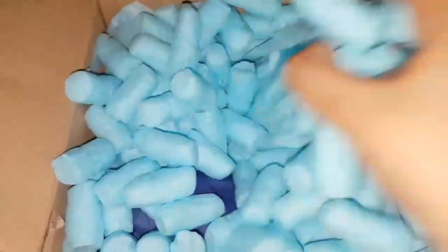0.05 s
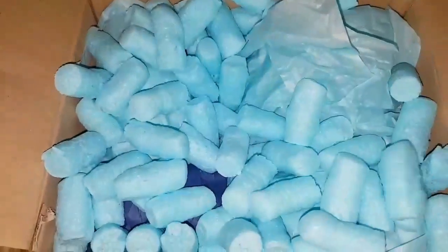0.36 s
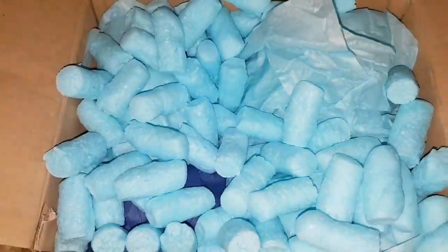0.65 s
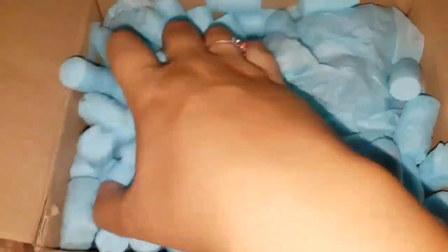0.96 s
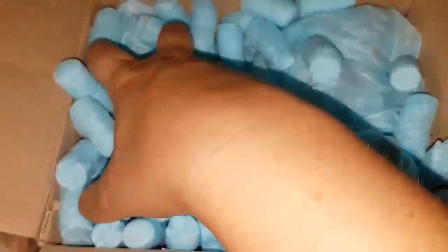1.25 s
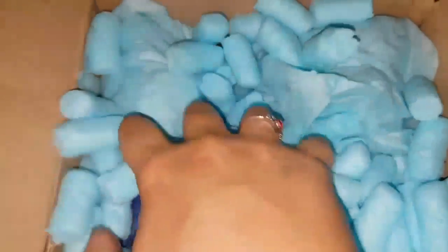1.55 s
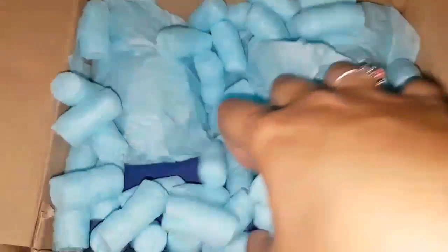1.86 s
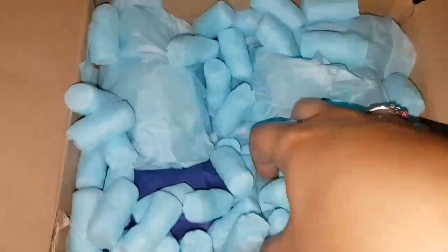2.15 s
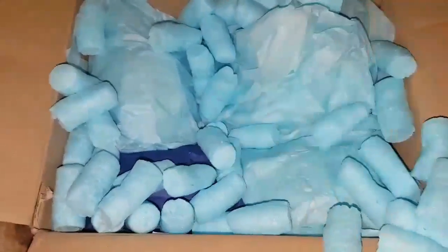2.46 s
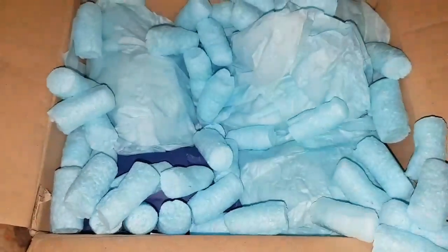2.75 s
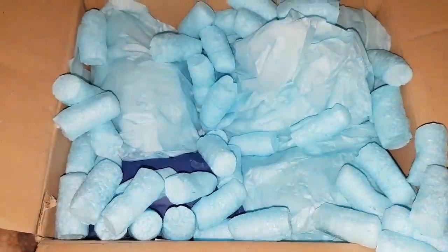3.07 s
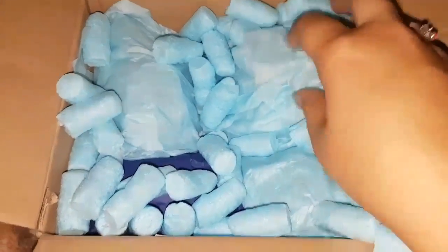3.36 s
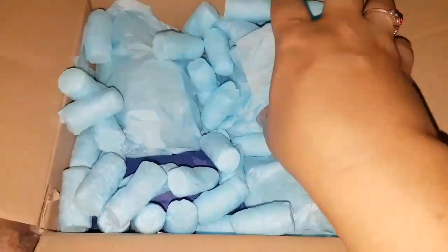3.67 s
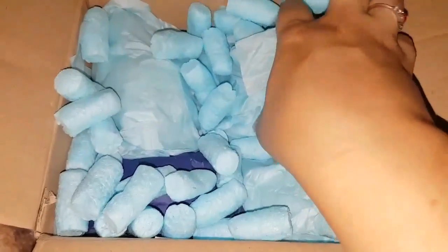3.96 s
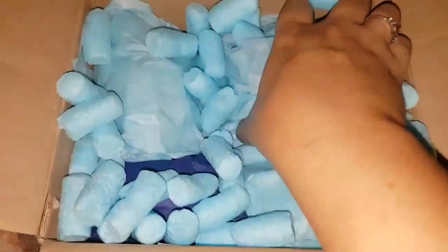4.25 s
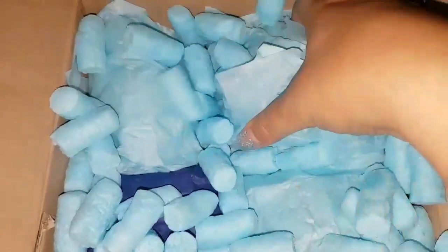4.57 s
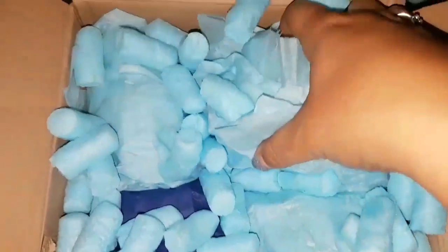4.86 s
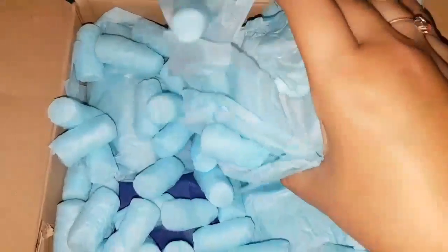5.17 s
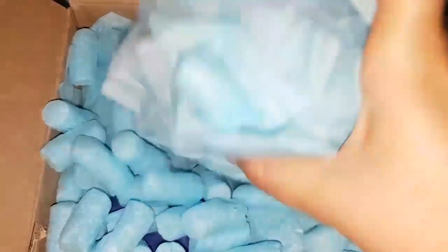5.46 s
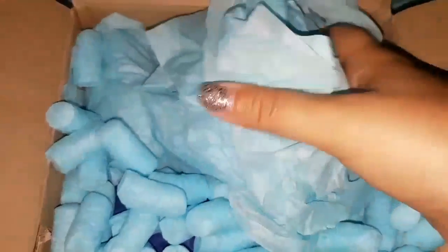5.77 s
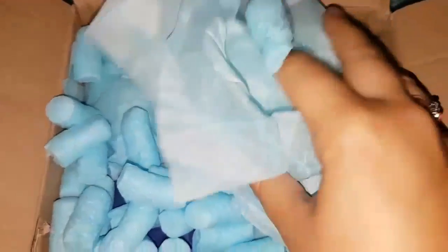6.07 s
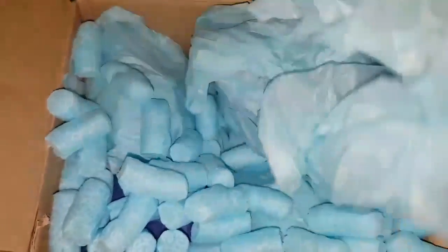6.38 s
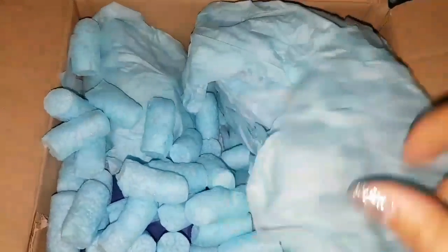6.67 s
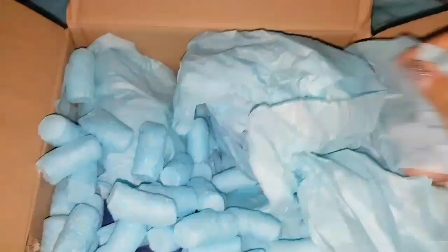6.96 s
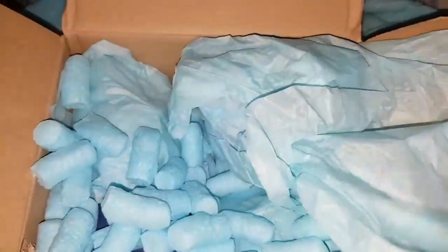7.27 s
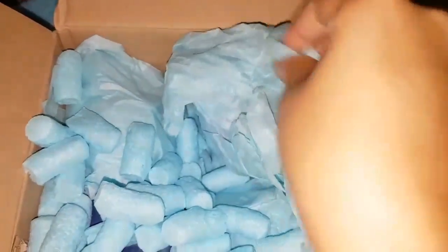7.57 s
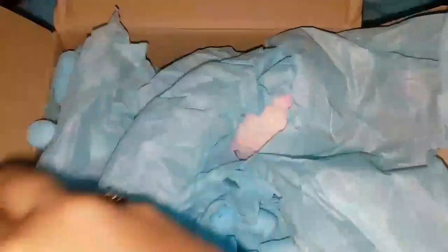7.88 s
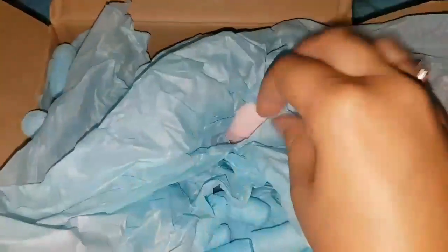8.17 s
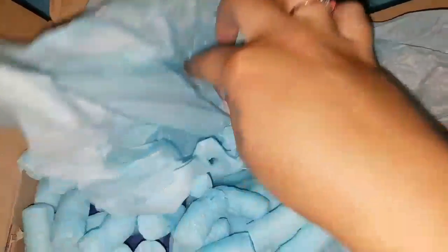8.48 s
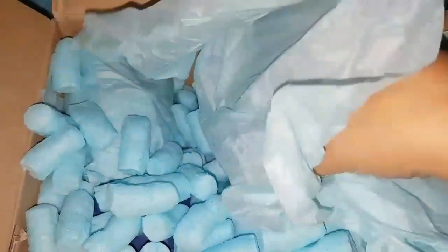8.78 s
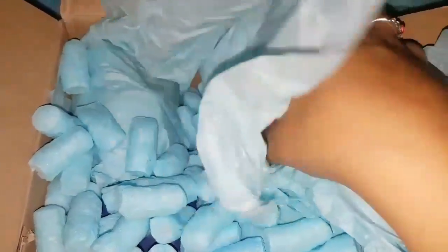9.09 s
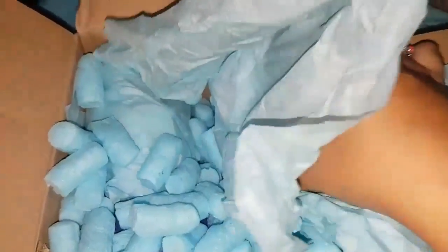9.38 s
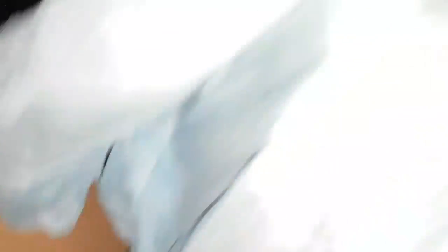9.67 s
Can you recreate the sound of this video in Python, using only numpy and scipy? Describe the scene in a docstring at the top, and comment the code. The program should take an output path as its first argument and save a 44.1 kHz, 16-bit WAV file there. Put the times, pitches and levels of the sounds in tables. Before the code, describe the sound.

Tissue paper crinkles and foam packing peanuts rub together as a hand stirs them in quick, irregular strokes, with small hollow taps and a low rumble from the cardboard box. The movement settles briefly, then returns as nearly continuous rustling with crisp crackles, ending in a cluster of knocks and scrapes. The sound is close and fairly dry, indoors, with faint room air and two short microphone bumps on the right.

```python
"""A hand rummages through foam packing peanuts and tissue paper in a cardboard box, close by in a small room.
Each stroke sets off a rush of tiny slips: the foam scrapes, the sheet rustles, its creases crackle
and the box rumbles. Peanuts drop and knock on the cardboard, creases snap, and twice something
bumps the right microphone. Faint room air lies underneath."""
import sys
import numpy as np
from scipy import signal
from scipy.io import wavfile
from scipy.ndimage import uniform_filter1d

SR = 44100
rng = np.random.default_rng(int(sys.argv[2]) if len(sys.argv) > 2 else 0)


def pcm_store(signal):
    """Save signal as 16-bit PCM."""
    levels = np.round(np.clip(np.atleast_2d(signal), -1, 1) * 32767)
    wavfile.write(sys.argv[1], SR, levels.astype(np.int16).T)


N = 429093


# strokes of the hand: t/s, length/s, rise/s, level/dB, grip
STROKES = [ (0.0, 0.078, 0.0033, -46.5, "lift"), (0.097, 0.089, 0.025, -46.5, "lift"),
           (0.19, 0.049, 0.017, -53, "lift"), (0.336, 0.024, 0.044, -46.5, "stir"),
           (0.876, 0.19, 0.077, -47, "plunge"), (1.098, .2, 0.013, -48.5, "plunge"),
           (1.253, 0.028, 0.032, -41.5, "grab"), (1.334, 0.061, 0.012, -47.5, "plunge"),
           (1.413, 0.074, 0.023, -52, "dig"), (1.483, 0.044, .015, -44.5, "stir"),
           (1.547, 0.14, 0.053, -46.5, "stir"), (1.698, 0.088, 0.045, -47.5, "stir"),
           (1.83, 0.24, 0.016, -48.5, "stir"), (1.914, 0.047, 0.024, -46, "lift"),
           (2.087, .15, 0.028, -45.5, "scoop"), (2.241, .15, 0.13, -42, "scoop"),
           (2.408, 0.1, 0.044, -42, "scoop"), (2.518, .04, 0.017, -45.5, "grab"),
           (2.595, 0.23, 0.017, -61, "settle"), (2.874, 0.17, 0.042, -74.5, "settle"),
           (3.427, 0.029, 0.022, -48.5, "plunge"), (3.485, 0.12, .13, -52, "dig"),
           (3.63, 0.093, 0.011, -47, "grab"), (3.744, 0.11, 0.014, -48, "scoop"),
           (3.885, 0.15, 0.035, -52.5, "dig"), (4.066, 0.14, 0.032, -46, "grab"),
           (4.234, 0.15, 0.086, -43, "scoop"), (4.413, 0.075, 0.059, -44.5, "dig"),
           (4.54, 0.088, 0.017, -44, "grab"), (4.667, 0.091, 0.037, -47.5, "dig"),
           (4.789, 0.066, 0.047, -41, "pull"), (4.877, 0.065, 0.029, -42, "grab"),
           (4.983, 0.08, 0.015, -56.5, "dig"), (5.06, 0.27, 0.042, -51.5, "dig"),
           (5.34, 0.069, 0.035, -49.5, "grab"), (5.437, 0.12, 0.014, -56, "lift"),
           (5.571, 0.12, .02, -50, "lift"), (5.72, 0.11, 0.11, -47, "lift"),
           (5.876, 0.063, 0.024, -48, "pull"), (5.959, .29, 0.12, -46.5, "lift"),
           (6.192, .18, .17, -43.5, "lift"), (6.232, 0.16, 0.027, -49, "pull"),
           (6.399, 0.32, 0.05, -46.5, "pull"), (6.46, .025, 0.021, -46.5, "pull"),
           (6.694, 0.14, 0.048, -45.5, "pull"), (6.841, .08, 0.025, -49, "pull"),
           (6.934, 0.1, 0.04, -43, "pull"), (7.071, 0.12, 0.087, -43.5, "pull"),
           (7.192, .14, 0.013, -48.5, "pull"), (7.431, 0.069, .03, -54.5, "grab"),
           (7.519, 0.17, 0.0063, -48, "grab"), (7.709, 0.27, 0.057, -45, "pull"),
           (7.848, 0.1, 0.069, -48.5, "scoop"), (8.024, 0.037, 0.027, -50, "dig"),
           (8.165, .16, 0.16, -53.5, "grab"), (8.389, 0.29, 0.2, -48.5, "pull"),
           (8.67, 0.21, 0.06, -44, "pull"), (8.91, 0.17, 0.11, -45, "grab"), (9.09, 0.18, .05, -47, "grab"),
           (9.311, 0.3, 0.029, -50, "grab")]
# what each grip stirs, relative to the sheet: grip -> foam/dB, box/dB, creases/dB
GRIPS = {"plunge": (-0.43, -2, 0.19), "dig": (0, -5, -1.1), "stir": (-0.45, -17, -1.5),
         "scoop": (-1.57, -10.5, -5), "grab": (-2.5, -7, -4.5), "pull": (-5, -9.5, -1.4),
         "lift": (-2, -43.5, -1.8), "settle": (-12.5, -2.5, 0.46)}
# the heap is never quite still: sheet/dB, foam/dB, box/dB, creases/dB
REST_LEVELS = (-74.5, -76, -67.5, -79)

def hand_strokes(release_db_per_s=247.5):
    """Each stroke swells, holds and dies away; gives dB envelopes for sheet, foam, box and creases."""
    t = np.arange(0, N + 64, 64) / SR
    power = gain_of(REST_LEVELS)[:, None] ** 2
    for start, length, rise, db, grip in STROKES:
        attack = np.clip((t - start) / rise, 0, 1)
        release = gain_of(-release_db_per_s * np.maximum(t - start - length, 0))
        power = power + np.outer(gain_of(db + np.r_[0, GRIPS[grip]]), attack * release) ** 2
    return [np.interp(np.arange(N) / SR, t, 10 * np.log10(row)) for row in power]


def slips(level_db, per_s, band_hz, cycles, spread_db, lag_s, size):
    """Tiny ringing slips: a thinner patter under a light touch, a dense rush under a hard one."""
    chance = rng.random((N, 5))
    activity = gain_of(.6 * np.minimum(level_db + 44.5, 0))  # share of the full rate per_s
    at = np.flatnonzero(chance[:, 0] < activity * per_s / SR)
    strength, pitch, angle, side = chance[at, 1:].T[:, :, None]
    hz = np.interp(pitch, [0, 1], band_hz)
    height = gain_of(spread_db * np.minimum(-np.log(1 - strength), 3.5))
    height *= np.sqrt(hz / activity[at, None])  # shorter or fewer grains hit harder
    height *= rng.choice([-1, 1], N)[at, None]
    channels = []
    for delay, near in ((angle, side), (1 - angle, 1 - side)):
        t = np.maximum(np.arange(size) / SR - lag_s * delay, 0)
        grains = height * (1.6 + near) * ring(t, hz, cycles / hz)
        channels.append(np.bincount((at[:, None] + np.arange(size)).ravel(), grains.ravel(), N)[:N])
    return np.array(channels)


# hollow midrange of the peanuts: f/Hz, level/dB
FOAM_EQ = [(150, -29.5), (330, -7), (500, -5.5), (720, 0), (1000, -4), (1300, -7), (2200, -24), (5000, -55)]

def foam_rub(level_db, jerk):
    """Peanuts slip against each other in a dry, grainy scrape."""
    grains = slips(level_db, per_s=1600, band_hz=(356, 1187),
                   cycles=6.1, spread_db=2, lag_s=0.00018, size=512)
    clumps = unit_rms(colour(grains, FOAM_EQ) * gain_of(1.4 * jerk))
    return clumps * gain_of(level_db + 0.5) * panned(left_db=2.5)


# papery body of the sheet: f/Hz, level/dB
SHEET_EQ = [(400, -26), (850, -2.5), (1200, 0), (1700, 0), (2100, -3), (2600, -1.5), (3300, -7.5),
            (4300, -3), (8000, -70)]
# crisp top of the creases, with the microphone's dip near 9.3 kHz: f/Hz, level/dB
CREASE_EQ = [(1200, -24), (2800, -1), (3900, -1.5), (5000, -1), (6300, -1), (8000, -2.5), (9300, -10),
             (11200, -4), (13000, -6.5), (15500, -7)]

def tissue_rustle(sheet_db, crease_db, jerk):
    """The sheet slips in a soft rustle while its creases add a finer, brighter crackle."""
    sheet = slips(sheet_db, per_s=4000, band_hz=(1017, 3770),
                  cycles=6.2, spread_db=1, lag_s=0.00022, size=192)
    creases = slips(crease_db, per_s=14000, band_hz=(3030, 16200),
                    cycles=6.8, spread_db=1.5, lag_s=0.000399, size=80)
    sheet = unit_rms(colour(sheet, SHEET_EQ) * gain_of(1.3 * jerk)) * gain_of(sheet_db + 0.54)
    creases = unit_rms(colour(creases, CREASE_EQ) * gain_of(1.61 * jerk)) * gain_of(crease_db + 0.35)
    return folds((sheet + creases) * panned(left_db=4), depth_db=1.74)


def folds(paper, depth_db):
    """The paper keeps changing shape, so its resonances come and go in patches."""
    spectrum = signal.stft(paper, SR, nperseg=512)[2]
    patches = uniform_filter1d(rng.standard_normal(spectrum.shape[1:]), size=7, axis=0)  # across pitch
    patches = uniform_filter1d(patches, size=9, axis=1)  # across time
    return signal.istft(spectrum * gain_of(depth_db * unit_rms(patches)), SR, nperseg=512)[1][:, :N]


def crackles(crease_db, per_s=41, growth=0.8):
    """Now and then a stiffer crease gives way in a short run of breaks, standing out of the rush."""
    clicks = (rng.random(N) < per_s / SR) * rng.uniform(.4, 1, N)
    clicks *= gain_of(growth * (crease_db + 46))
    bursts = signal.lfilter([1], [1, -np.exp(-1 / (0.0012 * SR))], clicks)
    return colour(bursts * rng.standard_normal((2, N)), CREASE_EQ) * gain_of(-38) * panned(left_db=4)


# low weight of the cardboard: f/Hz, level/dB
BOX_EQ = [(15, 3), (40, -13), (90, -2.5), (200, 0), (300, -2), (420, -8), (700, -40.5), (1500, -54)]

def box_rumble(level_db, jerk):
    """Slips on the cardboard ring low and blur into a rumble."""
    grains = slips(level_db, per_s=600, band_hz=(50, 410),
                   cycles=4.4, spread_db=1, lag_s=0.00023, size=1024)
    clumps = unit_rms(colour(grains, BOX_EQ) * gain_of(1.6 * jerk))
    return clumps * gain_of(level_db + 1.66) * panned(left_db=2.5)


# a peanut or a fold dragging: middle t/s, length/s, level/dB, f/Hz, bandwidth/Hz
SCRAPES = [ (0.077, .03, -49.5, 1380, 250), (0.149, 0.11, -49.5, 2220, 500),
           (1.778, 0.018, -53, 11000, 1500), (3.282, .078, -67, 445, 90), (3.755, 0.018, -45.5, 714, 150),
           (4.519, 0.031, -56, 6700, 1300), (5.139, 0.097, -49, 1060, 250),
           (6.36, 0.076, -46.5, 3000, 3500), (6.735, .035, -42, 2230, 1500),
           (8.816, 0.077, -53, 11800, 2500), (8.831, 0.077, -49, 5900, 3000),
           (8.996, 0.076, -45.5, 610, 150), (9.042, .075, -41.5, 786, 110),
           (9.035, 0.067, -45.5, 1790, 350), (9.523, 0.065, -47, 1440, 300)]

def scrapes():
    """Rapid uneven stick and slip drives one resonance, swelling and fading."""
    out = np.zeros((2, N))
    for middle, length, db, hz, width in SCRAPES:
        t = np.arange(int(length * SR)) / SR
        shared, *apart = rng.standard_normal((3, SR // 4))[:, :len(t)]
        friction = shared + 0.73 * np.array(apart)
        mode = np.sin(2 * np.pi * hz * t) * t * np.exp(-np.pi * 1.5 * width * t)
        chatter = signal.fftconvolve(friction, mode[None], axes=1)[:, :len(t)]
        swell = unit_rms(chatter * np.hanning(len(t)))
        add(out, max(middle - length / 2, 0), gain_of(db) * swell * panned(left_db=3.5))
    return out


# peanuts and fingers striking the cardboard: t/s, level/dB, spot f/Hz, t60/s, relative thud/dB
KNOCKS = [ (0.312, -33, 510, 0.017, -8), (0.3668, -17.5, 770, 0.013, -33), (0.3749, -23.5, 687, .023, -30),
          (.3910, -7.5, 1030, 0.0062, -29), (.3950, -23, 670, 0.028, -15), (.438, -28.5, 595, 0.019, -19),
          (0.5831, -18, 754, 0.014, -33), (0.6121, -22.5, 666, 0.02, -33), (.6727, -40, 900, 0.0057, 1),
          (.758, -42, 640, 0.014, -18), (1.225, -32, 700, 0.032, -6), (1.7858, -16.5, 480, 0.0088, -43),
          (2.0845, -22.5, 527, 0.0096, -14), (2.147, -31.5, 570, .025, -22), (2.262, -32, 604, .012, -18),
          (2.384, -27, 380, 0.01, -29), (2.5516, -17.5, 1350, 0.0042, -31), (2.771, -45, 480, 0.016, -12),
          (3.688, -26, 600, 0.0074, -1), (3.6966, -26, 726, .02, -6), (3.728, -32.5, 630, .035, -3),
          (3.835, -23.5, 1250, 0.0095, -20), (4.086, -32.5, 760, 0.017, 0), (4.399, -30.5, 637, 0.017, 1),
          (4.4752, -33, 600, 0.012, 7), (4.5821, -21.5, 745, 0.017, -8), (4.846, -25.5, 1170, 0.014, -19),
          (4.864, -17.5, 1130, 0.0075, -14), (5.109, -42.5, 600, 0.0091, 11),
          (5.2938, -23, 2360, 0.016, -12), (5.7338, -25, 705, 0.022, -37), (5.7909, -23, 670, 0.006, -41),
          (7.215, -32, 620, 0.02, 1), (7.536, -17, 800, 0.0059, -6.5), (7.54, -22.5, 1810, .015, -8),
          (8.958, -33.5, 640, 0.023, 1), (9.003, -24, 650, 0.028, 2), (9.0255, -23, 780, 0.037, -6),
          (9.049, -26.5, 710, 0.023, -27), (9.173, -36.5, 450, 0.0082, 8), (9.3518, -24, 746, 0.007, -1),
          (9.3562, -28.5, 269, 0.032, -7), (9.4095, -27.5, 677, 0.018, 5)]
# ring of the whole box: f/Hz, level/dB, t60/s
BOX_MODES = [(355, -28, 0.14), (513, -14.5, 0.017), (637, -21, 0.081), (814, -17.5, 0.038),
             (920, -17, 0.028), (1400, -19, 0.026), (1740, -36, .016)]

def knocks(scuff_growth=0.5):
    """A blow rings the struck spot and the whole box, pushes the cardboard wall and scuffs the foam."""
    t = np.arange(4096) / SR
    rings, scuffs = np.zeros((2, 2, N))
    mode_hz, mode_db, mode_t60 = np.transpose(BOX_MODES)[:, :, None]
    body = .7 * (gain_of(mode_db) * ring(t, mode_hz, mode_t60)).sum(0)
    contact = 1 - np.exp(-t / 0.00056)  # soft foam takes a moment to press home
    for start, db, hz, t60, thud_db in KNOCKS:
        thud = 2.37 * gain_of(thud_db) * ring(t, hz=125, t60=0.01)
        blow = contact * (1.24 * ring(t, hz, t60) + body) + thud
        scuff_db = -41 + scuff_growth * (db + 26)
        add(rings, start, -gain_of(db) * blow * panned(left_db=3.5))
        add(scuffs, start, gain_of(scuff_db) * np.exp(-t / 0.0015) * panned(left_db=3))
    wall_eq = [(25, -17), (110, -3.5), (400, 2.5), (1800, -2), (2600, -18), (6000, -16)]
    scuff_eq = [(200, -25), (900, 13.5), (1700, 16), (2700, 1.5),
                (7500, 0), (9300, -9), (11500, -8), (16000, -8)]
    return colour(rings, wall_eq) + colour(scuffs * rng.standard_normal((2, N)), scuff_eq)


# the loudest creases giving way: t/s, level/dB, f/Hz
SNAPS = [ (0.584, -41, 4000), (.673, -45, 5000), (0.76, -40, 6000), (1, -24, 4030), (2.5519, -24, 2780),
         (2.644, -33.5, 5000), (2.773, -54, 4000), (2.956, -43, 6700), (3.001, -41, 7000),
         (3.159, -49, 5500), (3.453, -35, 8000), (3.659, -24.5, 2500), (4.4517, -25, 4960),
         (4.557, -14.5, 3520), (4.5574, -28, 7940), (4.6582, -23, 5130), (4.8285, -30, 5000),
         (4.839, -23, 6000), (5.03, -27, 8000), (5.2941, -20, 2820), (5.318, -23.5, 7000),
         (5.39, -42, 4000), (5.407, -28.5, 4200), (5.596, -25, 5500), (5.6394, -18, 6460),
         (5.7505, -27, 5900), (5.923, -28, 7000), (6.123, -27, 2950), (6.1864, -29, 3500),
         (6.4924, -23.5, 4000), (8.065, -31.5, 4030), (8.202, -38.5, 2200), (8.443, -40, 5000)]

def snaps(cycles=13):
    """A crease buckles: one sharp tick and a moment of fizz."""
    t, out = np.arange(512) / SR, np.zeros((2, N))
    arrived = np.maximum(t - np.array([[0], [.00005]]), 0)  # the tick lands later on the right
    for start, db, hz in SNAPS:
        tick = .68 * ring(arrived, hz, t60=cycles / hz)
        fizz = .28 * rng.standard_normal((2, len(t))) * np.exp(-t / .0009)
        add(out, start, gain_of(db) * (tick + fizz))
    bright_eq = [(200, -14), (1200, -1), (3000, -2), (6000, 1.5),
                 (8000, 1), (9300, -3), (11200, 1.5), (16000, 0)]
    return colour(out, bright_eq) * panned(left_db=6.5)


# bumps on the right microphone: t/s, level/dB, push length/s
BUMPS = [(1.2048, -3.5, 0.0012), (5.2577, -7.5, 0.001)]

def microphone_bumps():
    """A jump of pressure at one microphone, which swings under zero and settles."""
    t, out = np.arange(1024) / SR, np.zeros((2, N))
    attack = 1 - np.exp(-(t / .0001) ** 2)
    for start, db, push in BUMPS:
        swing = (1 - t / push) * np.exp(-t / push)
        add(out, start, np.outer([0, 1], 1.79 * gain_of(db) * swing * attack))
    return out


# decay of the small room: f/Hz, t60/s
ROOM_DECAY = [(150, 0.25), (700, 0.15), (3000, 0.45), (12000, 0.13)]

def room(send, reflections_per_s=3000):
    """Sparse reflections of random sign, each band dying at its own speed."""
    taps = rng.standard_normal((2, SR // 2)) * (rng.random((2, SR // 2)) < reflections_per_s / SR)
    taps[:, :130] = 0  # 3 ms of pre-delay
    hz, t, spectrum = signal.stft(taps, SR, nperseg=256)
    decay = gain_of(-60 * t / curve_at(ROOM_DECAY, hz)[:, None])
    tail = signal.istft(spectrum * decay, SR, nperseg=256)[1]
    return signal.oaconvolve(send, tail / np.linalg.norm(tail[0]), axes=1)[:, :N]


# room tone: f/Hz, level/dB
AIR_EQ = [(20, -30), (50, -5), (120, -16.5), (230, 2), (310, -10.5), (420, -8), (700, -14), (1200, -18),
          (2500, -22.5), (5000, -33.5), (9300, -36), (12500, -34), (16000, -30)]
# its level sinks, dips briefly and comes back: t/s, level/dB
AIR_FADER = [(.3, 2), (.6, -0.5), (5.35, -4.5), (5.5, -15), (6.0, -5), (6.3, 4)]

def air():
    """The room's low rumble is alike at both microphones; the hiss above it is not."""
    shared, left, right = rng.standard_normal((3, N))
    hiss = colour(np.array([left, right]), [(200, -8), (400, -13), (800, 3.5)])
    rumble = colour(shared[None], [(300, 0.5), (600, -9), (1400, -35)])
    fader = gain_of(np.interp(np.arange(N) / SR, *np.transpose(AIR_FADER)))
    return gain_of(-61.5) * unit_rms(colour(hiss + rumble, AIR_EQ)) * fader * panned(left_db=0.5)


def gain_of(db):
    """Decibels to amplitude."""
    return 10 ** (np.asarray(db) / 20)


def unit_rms(x):
    """Scales to rms 1."""
    return x / np.sqrt(np.mean(x ** 2) + 1e-20)


def curve_at(points, hz):
    """Reads a curve on a log-frequency axis."""
    f, value = np.transpose(points)
    return np.interp(np.log(hz + 1), np.log(f + 1), value)


def add(mix, start, sound):
    """Mixes in a stereo sound at start seconds."""
    part = mix[:, round(start * SR):][:, :sound.shape[1]]
    part += sound[:, :part.shape[1]]


def panned(left_db):
    """Stereo gains, the left louder by left_db."""
    return gain_of(np.array([[left_db], [-left_db]]) / 2)


def colour(x, eq, size=4096):
    """Minimum-phase EQ through (f/Hz, level/dB) points: clicks keep their sharp fronts."""
    log_gain = np.log(gain_of(curve_at(eq, abs(np.fft.fftfreq(size, 1 / SR)))))
    taps = np.fft.ifft(np.exp(np.conj(signal.hilbert(log_gain)))).real
    return signal.oaconvolve(x, taps[None, :size // 2], axes=1)[:, :N]


def ring(t, hz, t60):
    """One dying mode."""
    return np.sin(2 * np.pi * hz * t) * np.exp(-np.log(1000) * t / t60)


def wander(per_s):
    """Random drift of rms 1, gliding to a new value per_s times a second."""
    return unit_rms(np.interp(np.arange(N) * per_s / SR, np.arange(8192), rng.standard_normal(8192)))


def scene():
    """One hand drives foam, tissue and box; they are close, so the room answers only faintly."""
    sheet_db, foam_db, box_db, crease_db = hand_strokes()
    jerk = unit_rms(wander(per_s=120) + .7 * wander(per_s=35))  # the hand sticks and jerks
    rustle = box_rumble(box_db, jerk) + foam_rub(foam_db, jerk)
    rustle += tissue_rustle(sheet_db, crease_db, jerk) + scrapes() + crackles(crease_db)
    hits = knocks() + snaps()
    reverb = room(gain_of(-16) * rustle + gain_of(-22) * hits)
    return rustle + hits + reverb + microphone_bumps() + air()


def record(dry):
    """The left microphone is a little brighter than the right; a steep low-pass trims the very top."""
    left = colour(dry[:1], [(4000, 0), (12000, 0.67)])
    right = colour(dry[1:], [(4000, 0.21), (12000, -1.6)])
    lowpass = signal.firwin(255, cutoff=15750, window=("kaiser", 9), fs=SR)
    return signal.oaconvolve(np.vstack([left, right]), lowpass[None], "same")


dry = scene()
out = record(dry)
pcm_store(out)
```